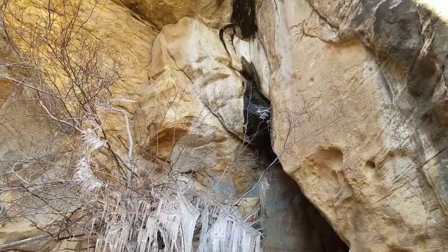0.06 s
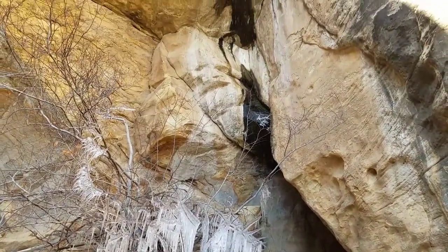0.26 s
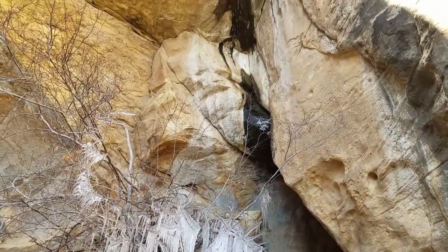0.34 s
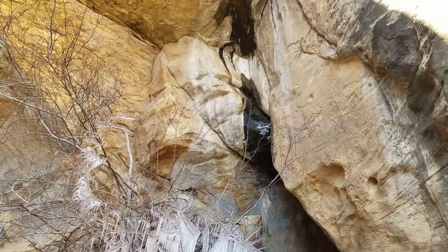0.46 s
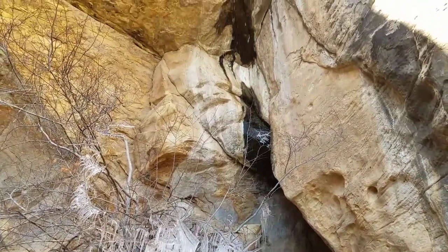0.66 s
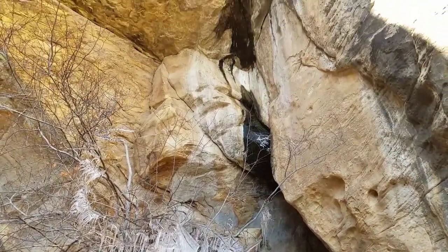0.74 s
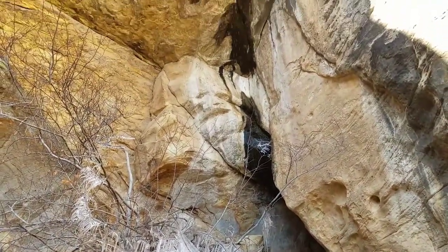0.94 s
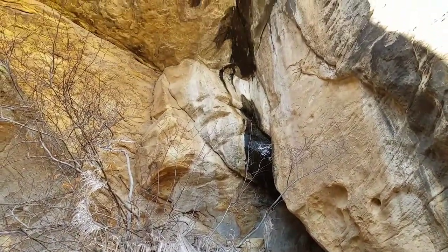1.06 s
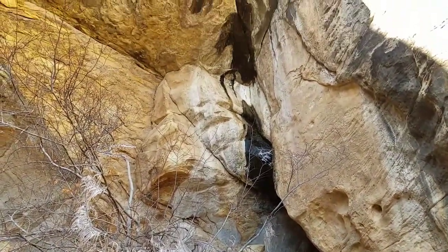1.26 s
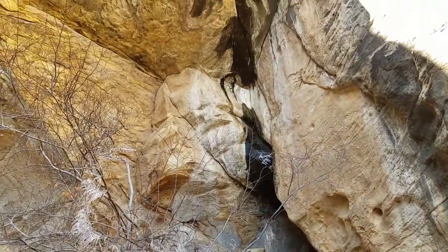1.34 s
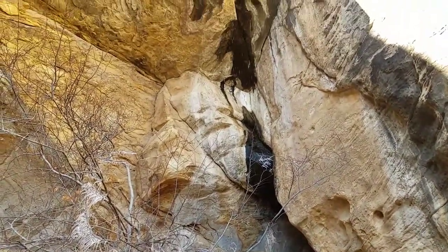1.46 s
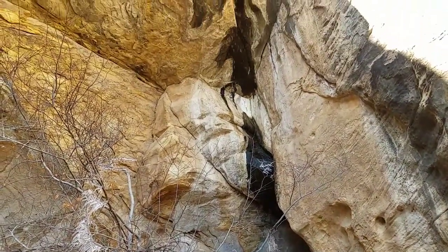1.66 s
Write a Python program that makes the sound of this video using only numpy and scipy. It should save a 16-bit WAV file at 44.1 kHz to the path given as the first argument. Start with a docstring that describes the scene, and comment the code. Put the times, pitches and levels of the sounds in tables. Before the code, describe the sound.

Water drips irregularly onto rock while wind thumps against the microphone.

```python
"""In a canyon, meltwater drips from ice onto rock, mostly to the right of a stereo microphone.
A few drops tick close by, each with a short plink and a fine spray; further off, many small ones
merge into a patter, and the rock face gives both a brief echo. Light wind rumbles on the microphone,
and single eddies thump its ports, mostly the left one."""
import sys
import numpy as np
from scipy import signal
from scipy.io import wavfile

SR = 44100
rng = np.random.default_rng(int(sys.argv[2]) if len(sys.argv) > 2 else 0)


def waveform_to_disk(signal):
    """Save audio, clipped to [-1, 1], as 16-bit WAV at the path in sys.argv[1]."""
    frames = np.transpose(np.atleast_2d(signal))
    scaled = np.clip(frames, -1, 1) * 32767
    samples = np.round(scaled).astype(np.int16)
    wavfile.write(sys.argv[1], SR, samples)


N = 74970

# tone of water landing on rock, near or far (frequency [Hz], level [dB])
DRIP_SPECTRUM = [(100, -34), (900, -15), (1350, -9.5), (1800, 0), (2250, 1.5), (3000, -4), (4300, -7),
                 (5400, -5), (6200, -19.5), (7100, -35), (8100, -37.5), (9200, -16.5), (10800, -5),
                 (12600, -14.5), (14000, -10.5), (16000, -20.5)]
TICK_TOP_HZ = 11500


def near_drops():
    """Drops strike the rock close to the microphone, each its own mix of body, splash and spray."""
    # (time [s], level [dB], then added to that level: body [dB], splash [dB], spray [dB])
    drops = [(0.0516, -37.5, -6, -12.5, -14.5), (0.194, -39, -2, -5.5, -55),
             (0.2183, -20.5, -8.5, -19.5, -29.5), (0.2462, -43.5, -29, -7, -9),
             (0.36, -31.5, -9, -11.5, -24), (0.4874, -29, -12, -9.5, -53.5), (0.5097, -36.5, -23, -13, -30),
             (0.567, -38.5, -19, -10, -25), (0.6288, -23.5, -14.5, -25, -28.5),
             (0.7571, -33.5, -12.5, -13.5, -24), (0.807, -32, -9, -15, -36), (0.814, -32, -11.5, -12, -16),
             (0.9151, -35, -9, -15, -23.5), (1.0081, -37, -6, -9, -29), (1.0173, -35.5, -23, -16, -14),
             (1.0919, -35, -10.5, -21, -28), (1.1252, -31.5, -14, -14.5, -34), (1.1468, -22, -11, -18, -46),
             (1.1978, -30, -4, -14, -45), (1.3315, -28.5, -12, -15.5, -21.5), (1.355, -26.5, -17, -22, -25),
             (1.4149, -33, -13, -12, -19.5), (1.441, -31, -6.5, -16, -46), (1.4963, -38, -11, -11, -24),
             (1.5123, -36.5, -10, -12, -21.5), (1.5865, -30.5, -29, -13, -18),
             (1.5931, -26.5, -10, -16.5, -18), (1.683, -30, -11.5, -11.5, -30)]
    # reflections off the nearest stone (delay [s], gain [ratio])
    echoes = [(.0015, .4), (.0026, 0.29), (.0041, .2)]
    drop_db, body_trim_db, splash_trim_db, spray_trim_db = -7.5, 1, 4.5, 1.5
    body_top_hz, splash_top_hz = 3020, 5500
    impact_delay_s, scatter_s = 0.001103, .005
    ring_db, ring_hz, ring_s = -10.5, 2600, 0.00053
    spray_rise_s, burst_s, mist_s, mist_db = 0.00097, 0.0018, 0.042, 0.5
    out, t = np.zeros(N), np.arange(SR // 10) / SR
    plink = amp(ring_db) * np.cos(2 * np.pi * ring_hz * t) * np.exp(-t / ring_s)
    for s, level_db, body_db, splash_db, spray_db in drops:
        paths = .045 * rng.standard_normal(len(t)) * np.exp(-t / scatter_s)  # scatter off nearby stone
        paths[0] = 1  # direct sound
        for delay, gain in echoes:
            add(paths, delay * rng.uniform(.85, 1.15), np.array([gain]))
        hit = colour(paths + signal.fftconvolve(paths, plink)[:len(t)], DRIP_SPECTRUM)
        body = unit(cut(hit, body_top_hz, "low", order=3))
        splash = cut(hit, body_top_hz, "high", order=3)
        splash = unit(cut(splash, splash_top_hz, "low", order=4))
        # fine droplets thrown up by the impact: a quick burst and a lingering mist
        burst, mist = rng.standard_normal((2, len(t))) * (1 - np.exp(-t / spray_rise_s))
        burst = unit(cut(burst * np.exp(-t / burst_s), TICK_TOP_HZ, "low", order=4))
        mist = amp(mist_db) * unit(mist * np.exp(-t / mist_s))
        spray = unit(cut(colour(burst + mist, DRIP_SPECTRUM), splash_top_hz, "high", order=6))
        drop = (amp(body_db + body_trim_db) * body
                + amp(splash_db + splash_trim_db) * splash
                + amp(spray_db + spray_trim_db) * spray)
        add(out, s + impact_delay_s, amp(level_db + drop_db) * drop)
    return out


def distant_patter():
    """Many small drops further off: ticks and plinks over a steady wash."""
    # rise and fall of the distant dripping (time [s], level [dB])
    swells = [(0, 0), (.15, -3), (.27, 1.5), (.42, 1.5), (.57, 0.5), (.73, -3), (.84, 2), (.92, -1.5),
              (1.1, 1), (1.28, -1), (1.35, -2.5), (1.47, -0.5), (1.55, -1), (1.61, -5.5), (1.7, -2)]
    tick_db, plink_db, wash_db = -52.5, -52.5, -51.5
    ticks = cut(impacts(per_s=650), TICK_TOP_HZ, "low", order=3)
    layers = (tick_db, ticks), (plink_db, plinks()), (wash_db, rng.standard_normal(N))
    return level(swells) * sum(amp(db) * unit(colour(x, DRIP_SPECTRUM)) for db, x in layers)


def plinks(per_s=300, low_hz=2025, high_hz=6030, pitches=20, decay_cycles=2.4):
    """Small drops land in wet hollows, each ringing for a few cycles at its own pitch."""
    out, t = np.zeros(N), np.arange(SR // 50) / SR
    for hz in np.geomspace(low_hz, high_hz, pitches):
        ring = np.sin(2 * np.pi * hz * t) * np.exp(-hz * t / decay_cycles)
        out += signal.oaconvolve(impacts(per_s / pitches), ring)[:N]
    return out


def impacts(per_s, spread_db=6):
    """Drops land at random moments, most of them small."""
    sizes = amp(spread_db * np.minimum(rng.exponential(1, N), 3.5)) * rng.choice([-1, 1], N)
    return sizes * (rng.random(N) < per_s / SR)


def wind_thumps():
    """Eddies hit the microphone: dull thumps on the left, fainter pops with a hollow ring on the right."""
    # eddies at each port (time [s], suction [dB], swell [s], push [dB], push length [s], turbulence [0-1])
    left_eddies = [(.0715, -22, 0.0069, -25.5, 0.013, 0.18), (.1325, -26, 0.00077, -39, 0.0033, 0.37),
                   (.2281, -5.5, 0.00012, -16.5, 0.00051, 0.43), (.2294, -1.5, 0.0016, -2.5, 0.0053, 0.12),
                   (.3104, 0, 0.0011, -14, 0.011, 0.14), (.3127, -11, 0.00068, -10.5, 0.0033, 0.19),
                   (.3184, -1, 0.00092, -3, 0.0047, .04), (.3968, -18, 0.00073, -11.5, 0.0073, 0),
                   (.4089, -10, 0.0018, -21, 0.0025, 0.1), (.5427, -6.5, .0006, -13.5, 0.0019, 0.1),
                   (.5452, -12, 0.0011, -16, .003, 0.15), (.561, -27.5, 0.0045, -39, 0.0081, 0.18),
                   (.6126, 0.5, 0.0013, -6, 0.0067, 0.17), (.652, -23.5, 0.0021, -37, 0.0091, 0.1),
                   (.88, -26, .002, -39, 0.0029, .05), (.9932, -10, 0.00075, -18, 0.00242, 0),
                   (1.0665, -9.5, 0.0086, -38, 0.0036, 0.06), (1.1378, -44, .002, -23, 0.0026, 0.43),
                   (1.2299, -1, 0.0025, -9.5, 0.0033, 0.05), (1.2349, -7, 0.0013, -9, 0.0056, 0.03),
                   (1.3101, 0, 0.0057, -2.5, 0.0044, 0.05), (1.3183, -12.5, .0027, -8.5, 0.0057, 0.07),
                   (1.3295, -32, 0.00048, -26, 0.0068, 0.75), (1.3903, -5.5, 0.0028, 0, 0.0045, 0.09),
                   (1.574, -25.5, 0.0038, -33, .004, 0.05)]
    right_eddies = [(.0556, -22.5, 0.00076, -42, 0.00096, 0), (.0596, -18.5, 0.00045, -20, .0013, 0.2),
                    (.5575, -34, 0.00093, -46, 0.0016, 0.1), (.6328, -22, 0.00078, -36, 0.0015, 0),
                    (.6408, -23.5, 0.00017, -19.5, 0.00041, 0.2), (.6418, -12.5, 0.00021, -20, 0.002, 0),
                    (1.3175, -26, .0005, -43, .001, .3)]
    hollow_hz, hollow_q, hollow_db = 604, 3.2, -2
    thumps = buffeting(left_eddies, release_s=0.0024, top_hz=1430)
    pops = buffeting(right_eddies, release_s=0.00017, top_hz=2700)
    hollow = amp(hollow_db) * signal.lfilter(*signal.iirpeak(hollow_hz, hollow_q, SR), pops)
    return np.array([thumps, pops + hollow])


def buffeting(eddies, release_s, top_hz, bass_cut_hz=75.4, bass_cut_q=1.084):
    """The eddies at one port rebound as thumps through the microphone's bass cut."""
    out = np.zeros(N)
    for s, *shape in eddies:
        pressure = eddy(*shape, release_s)
        add(out, s - len(pressure) / 2 / SR, pressure)
    w = 2 * np.pi * bass_cut_hz
    bass_cut = signal.bilinear([1, 0, 0], [1, w / bass_cut_q, w * w], SR)
    return cut(signal.lfilter(*bass_cut, out), top_hz, "low", order=3)


def eddy(suction_db, swell_s, push_db, push_s, turbulence, release_s, swirl_top_hz=722):
    """Suction builds and lets go at mid-length; a short push of air follows."""
    t = np.arange(-(SR // 20), SR // 20) / SR
    suction = amp(suction_db) * np.exp(np.where(t < 0, t / swell_s, -(t / release_s) ** 2))
    push = amp(push_db) * np.sin(np.pi * np.clip(t / push_s, 0, 1))
    swirl = unit(cut(rng.standard_normal(len(t)), swirl_top_hz, "low", order=3))
    return push - suction + turbulence * swirl * (push + suction) / 2


def rock_face(x, echo_db=-9, t60_s=0.11):
    """The canyon wall adds sparse, quickly dying reflections."""
    t = np.arange(SR // 2) / SR
    taps = rng.standard_normal(len(t)) * (rng.random(len(t)) < 1 / 20) * amp(-60 * t / t60_s)
    return x + amp(echo_db) * signal.fftconvolve(x, taps / np.linalg.norm(taps))[:N]


def canyon_air(left_db=-45.5, right_db=-47.5):
    """Soft wind rumble and canyon air, rising and falling separately at each port."""
    # tone of the air (frequency [Hz], level [dB])
    left_tone = [(20, -6.5), (50, -2.5), (110, 0.5), (220, -9), (400, -23), (700, -23.5), (1100, -30.5),
                 (2000, -34.5), (5000, -40), (8000, -60)]
    right_tone = [(20, -7.5), (50, 0.5), (100, -7.5), (220, -9), (400, -17), (700, -18.5), (1100, -23),
                  (2000, -25), (5000, -79), (8000, -83)]
    # strength of the wind (time [s], level [dB])
    left_wind = [(0, 1.5), (.18, -6), (0.299, 5.5), (.5, 0.5), (.62, -0.5), (.71, 5.5), (.8, 1.5), (.9, 4),
                 (1.02, -2), (1.199, -2), (1.4, 3), (1.52, 2), (1.7, -2.5)]
    right_wind = [(0, -0.5), (0.301, 0), (.6, -0.5), (.76, -2), (.85, 1.5), (1, 0), (1.12, 0),
                  (1.251, -1.5), (1.421, -4), (1.549, 0.5), (1.7, -2)]
    ports = (left_db, left_wind, left_tone), (right_db, right_wind, right_tone)
    return np.array([amp(db) * level(wind) * unit(colour(rng.standard_normal(N), tone))
                     for db, wind, tone in ports])


def amp(db):
    """Decibels to gain."""
    return 10 ** (np.asarray(db) / 20)


def unit(x):
    """Scales to rms 1."""
    return x / np.sqrt(np.mean(x ** 2) + 1e-20)


def level(points):
    """Gain over time from (time [s], level [dB]) points."""
    return amp(np.interp(np.arange(N) / SR, *np.transpose(points)))


def add(mix, s, sound):
    """Mixes a sound in at a time."""
    start = round(s * SR)
    part = mix[max(start, 0):max(start + len(sound), 0)]
    part += sound[max(-start, 0):][:len(part)]


def colour(x, points, size=4096):
    """Minimum-phase filter through (frequency [Hz], gain [dB]) points."""
    hz, db = np.transpose(points)
    bin_hz = abs(np.fft.fftfreq(size, 1 / SR))
    log_gain = np.log(amp(np.interp(np.log(bin_hz + 1), np.log(hz), db)))
    response = np.fft.ifft(np.exp(np.conj(signal.hilbert(log_gain)))).real
    return signal.fftconvolve(x, response[:size // 2])[:len(x)]


def cut(x, hz, kind, order):
    """Low or high pass."""
    return signal.sosfilt(signal.butter(order, hz, kind, fs=SR, output="sos"), x)


def scene():
    """Dripping to the right, wind on both ports; they share the near drops, each has its own patter."""
    # shading of the left port from the dripping (frequency [Hz], gain [dB])
    shade = [(500, 6), (1200, -2.5), (2200, -20), (5400, -21), (11000, -18.5), (15000, -7)]
    near = near_drops()
    left = colour(rock_face(near + distant_patter()), shade)
    right = rock_face(near + distant_patter())
    return np.array([left, right]) + wind_thumps() + canyon_air()


def record(dry, ceiling=.95, top_hz=16100):
    """The recorder rounds off the loudest thumps just under full scale, then cuts the highest treble."""
    rounded = dry / (1 + (dry / ceiling) ** 12) ** (1 / 12)
    band_limit = signal.firwin(511, top_hz, window=("kaiser", 9), fs=SR)
    return signal.oaconvolve(rounded, band_limit[None], "same")


dry = scene()
out = record(dry)
waveform_to_disk(out)
```